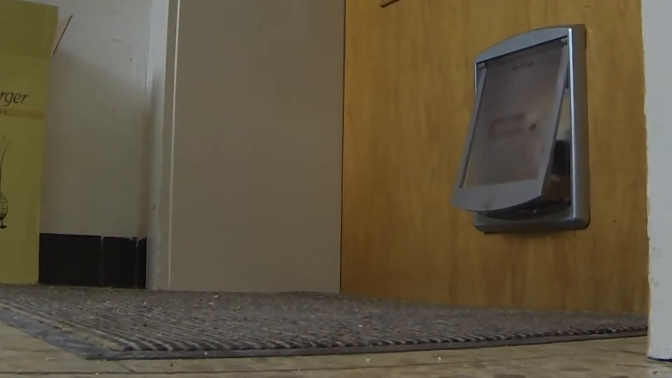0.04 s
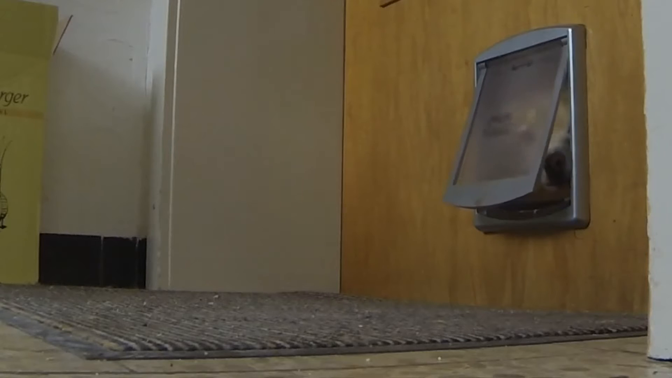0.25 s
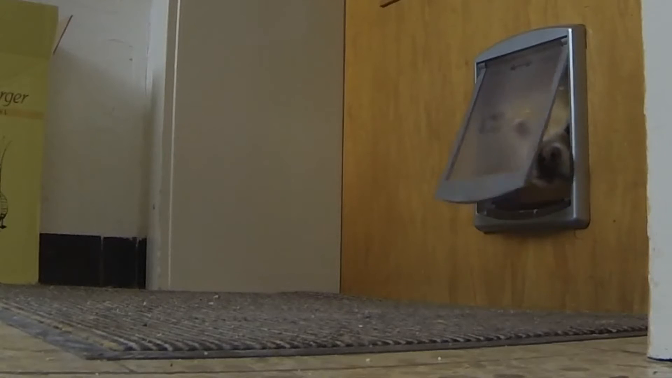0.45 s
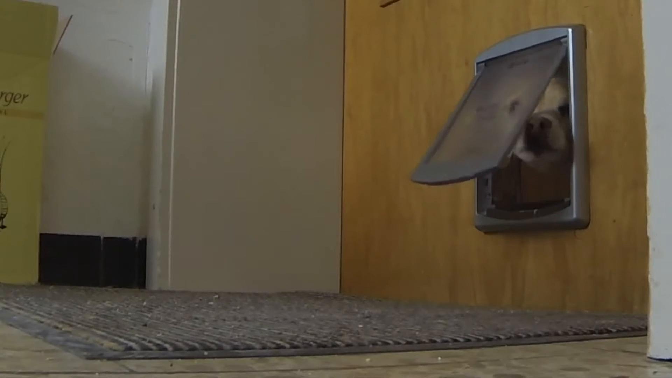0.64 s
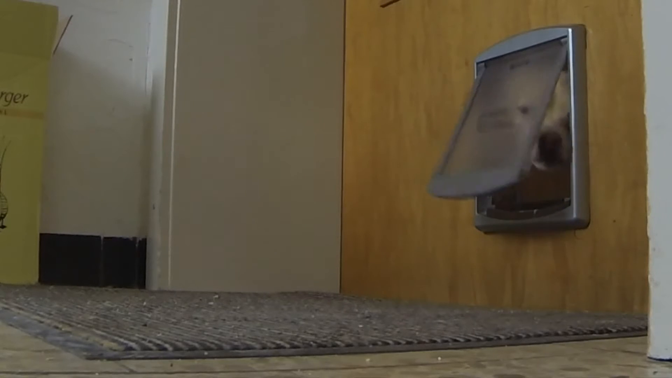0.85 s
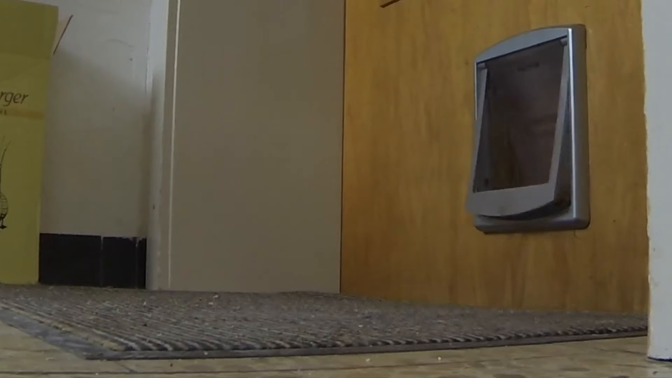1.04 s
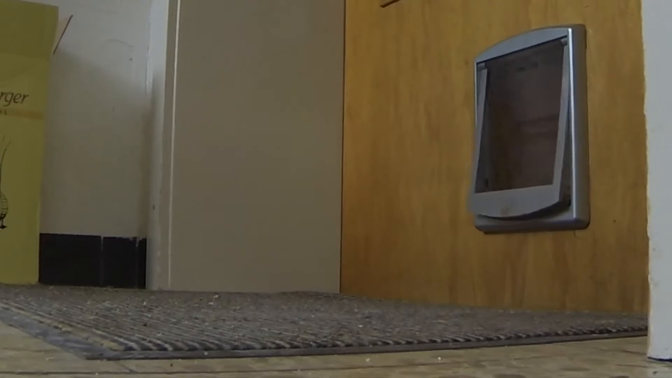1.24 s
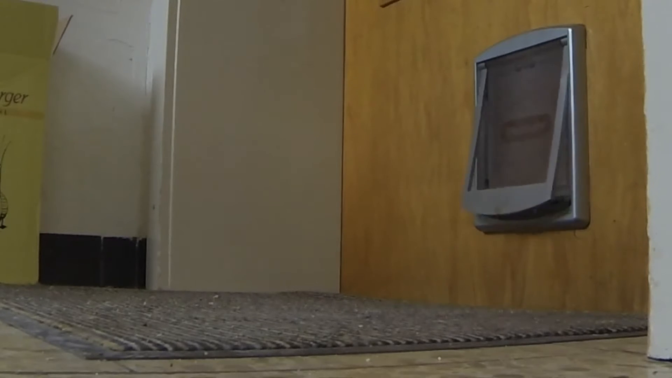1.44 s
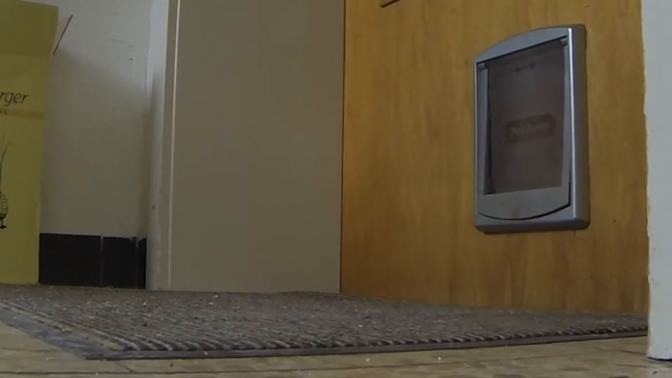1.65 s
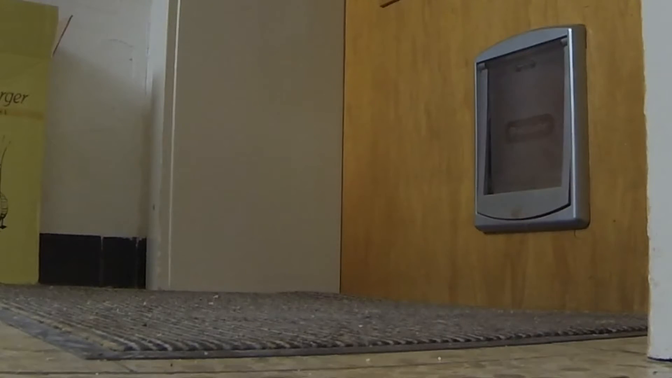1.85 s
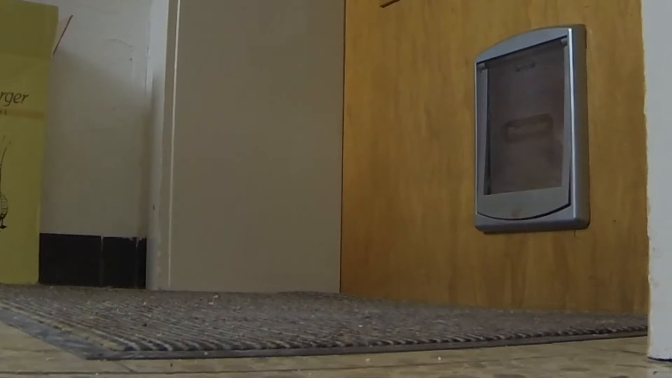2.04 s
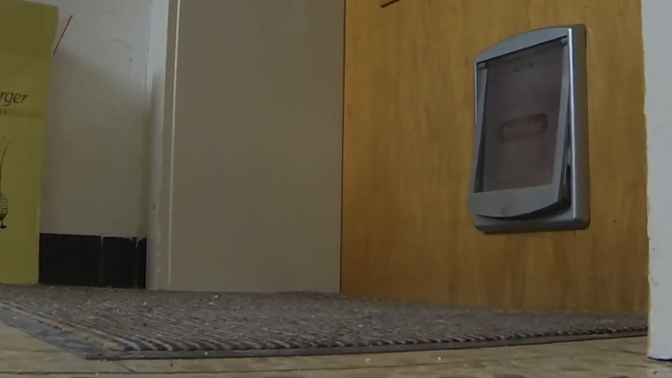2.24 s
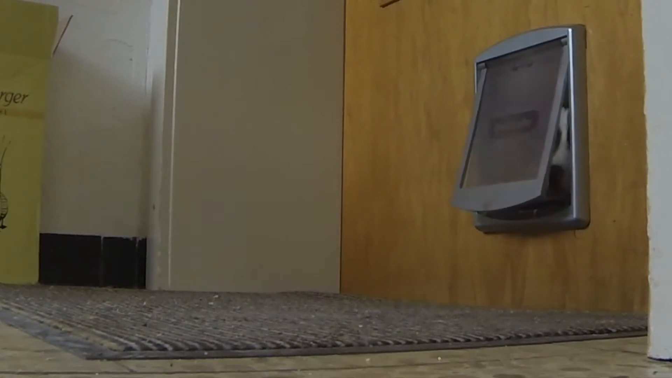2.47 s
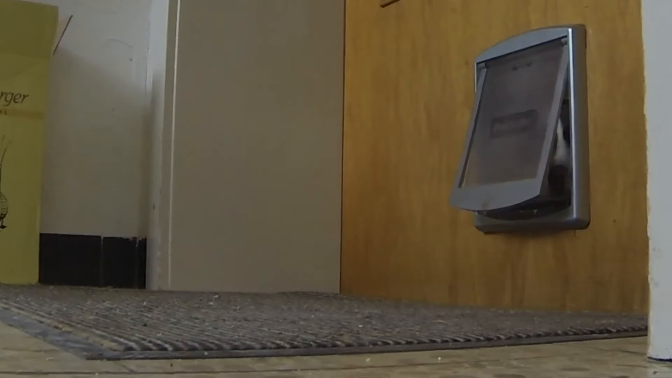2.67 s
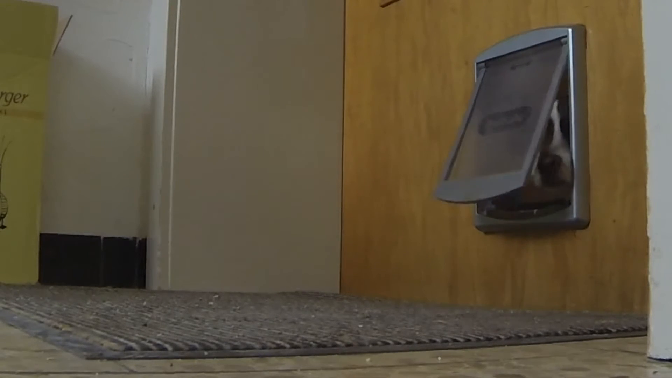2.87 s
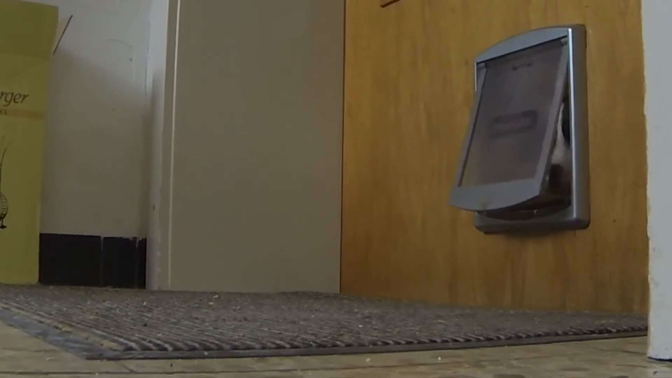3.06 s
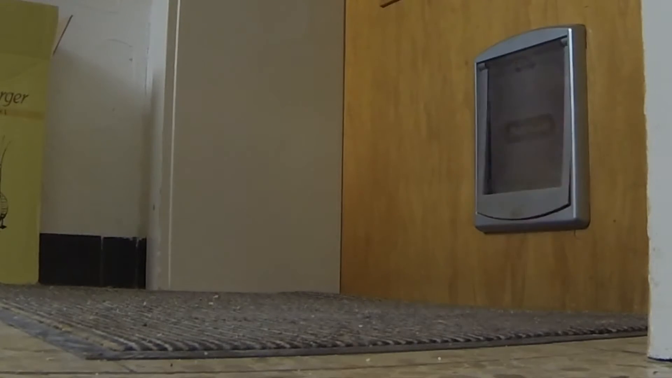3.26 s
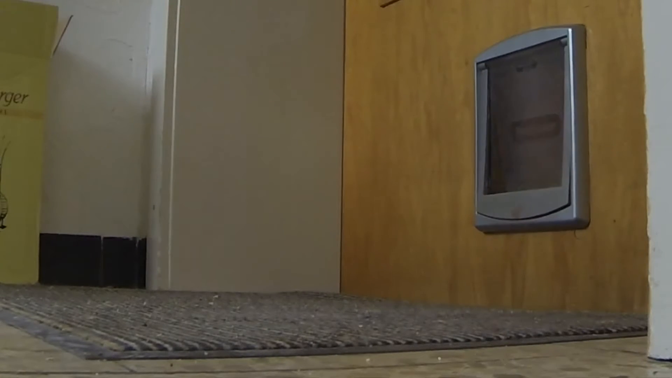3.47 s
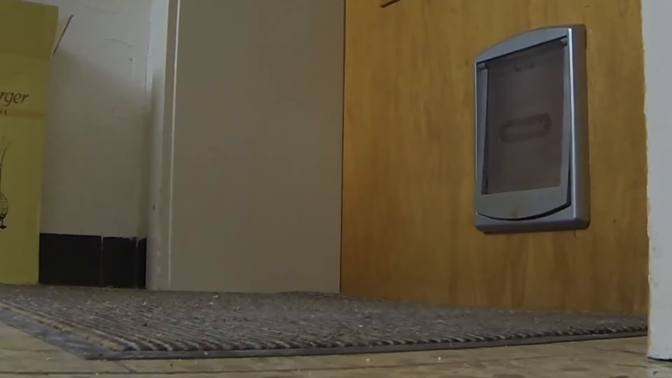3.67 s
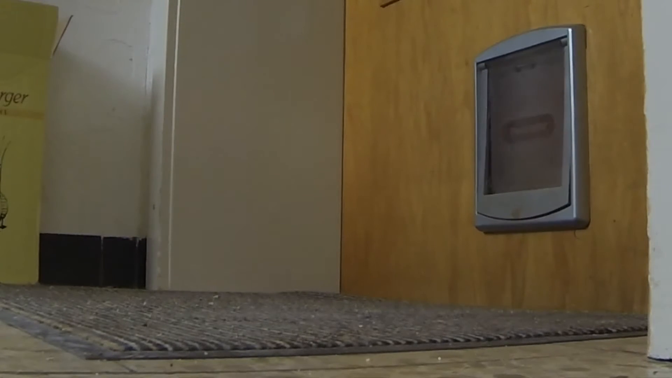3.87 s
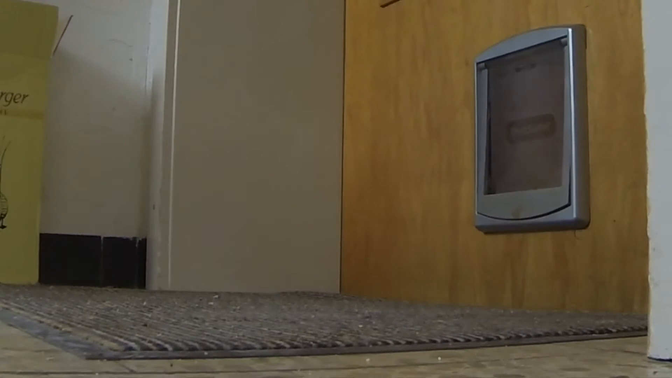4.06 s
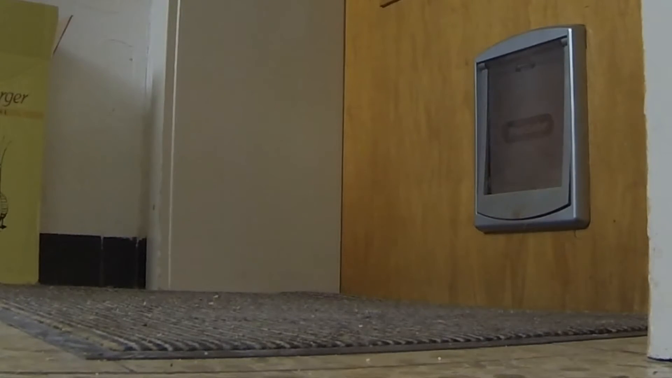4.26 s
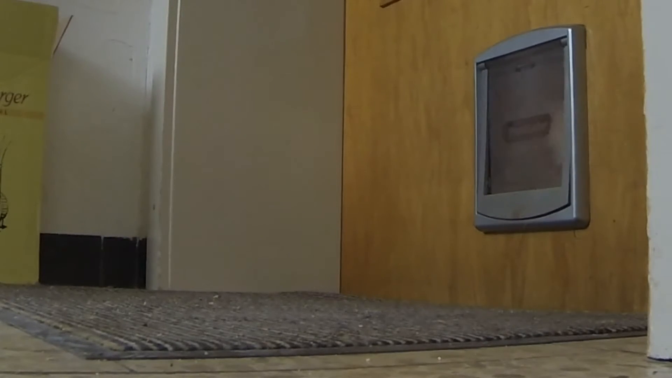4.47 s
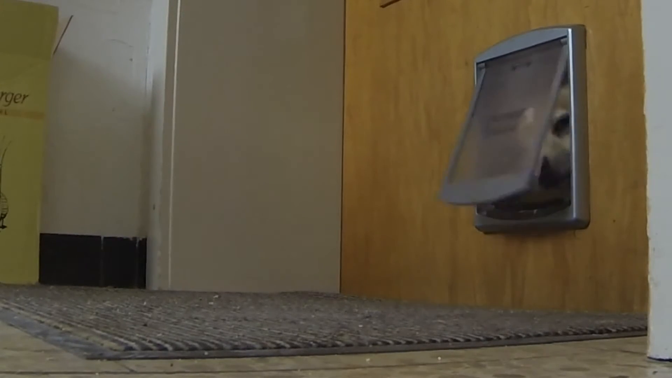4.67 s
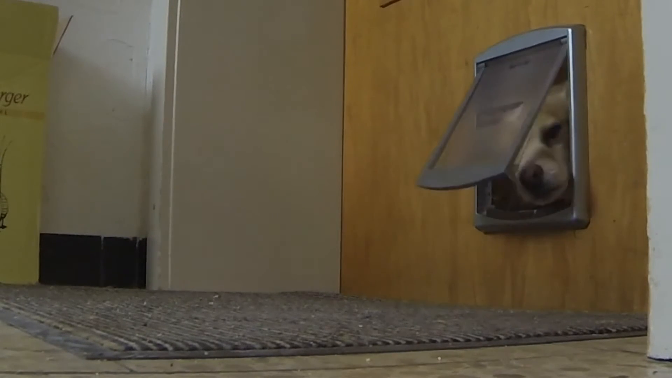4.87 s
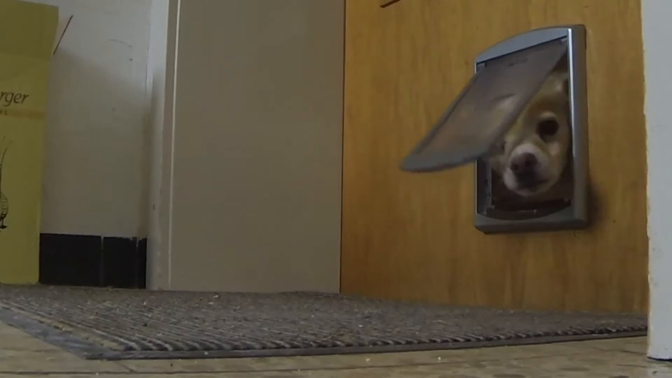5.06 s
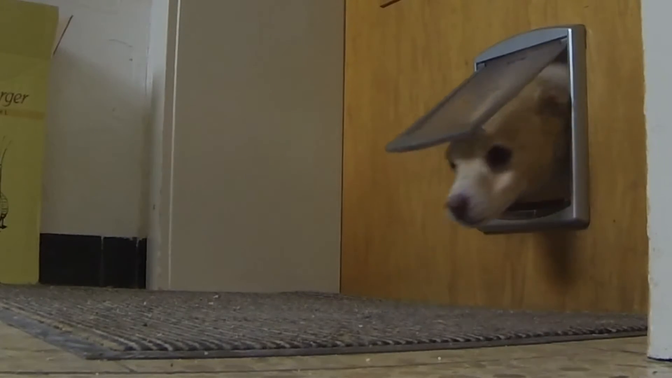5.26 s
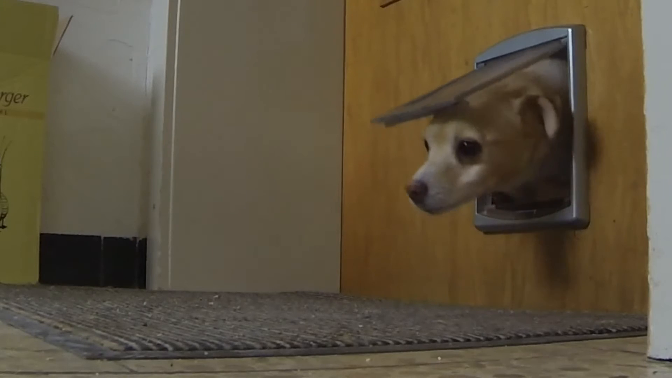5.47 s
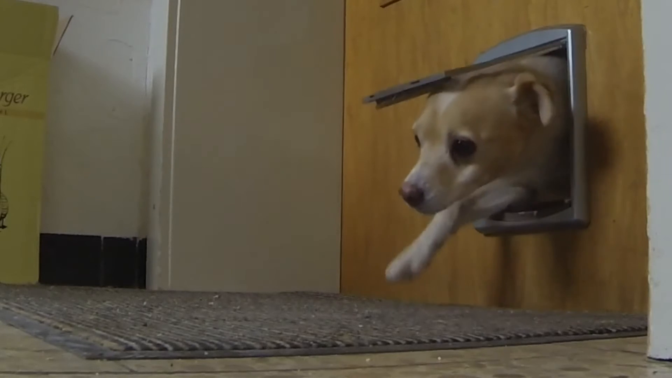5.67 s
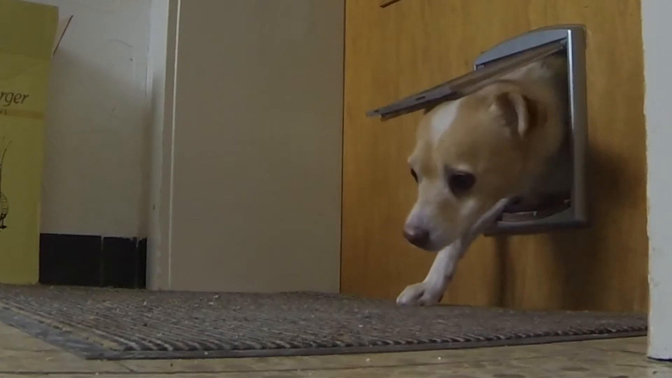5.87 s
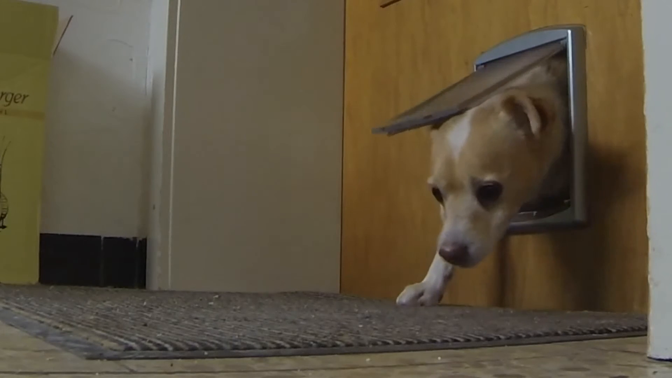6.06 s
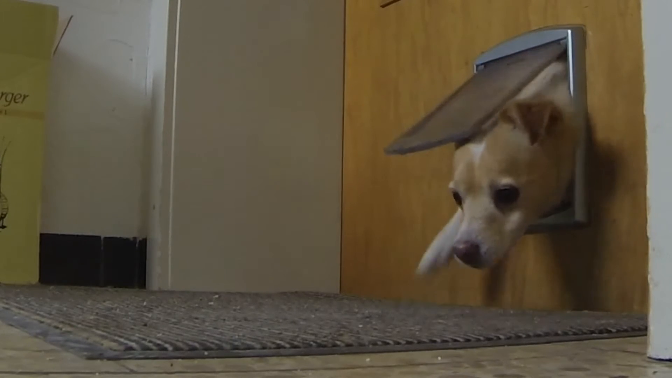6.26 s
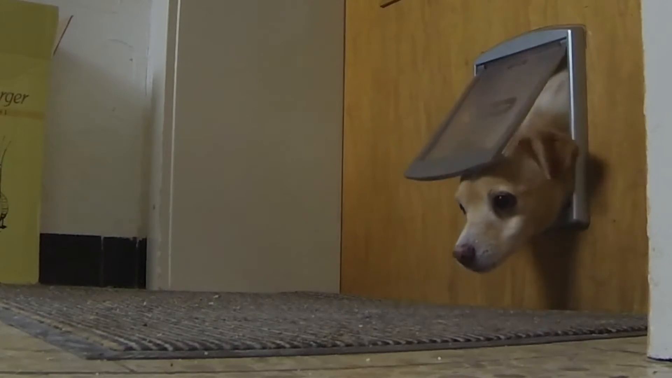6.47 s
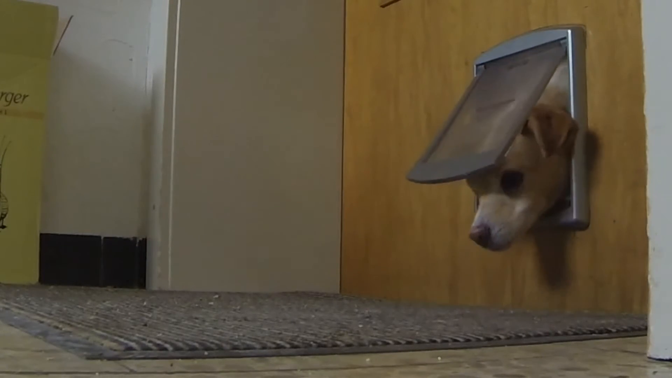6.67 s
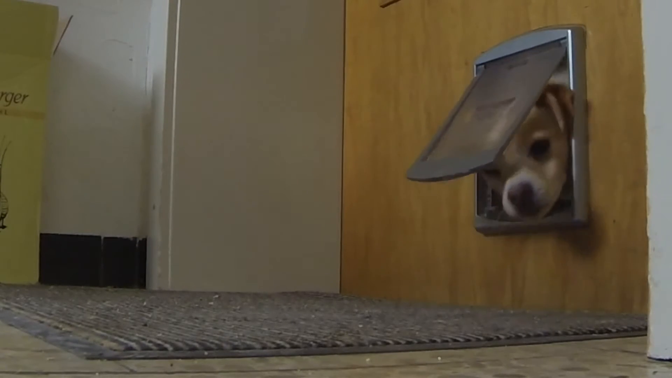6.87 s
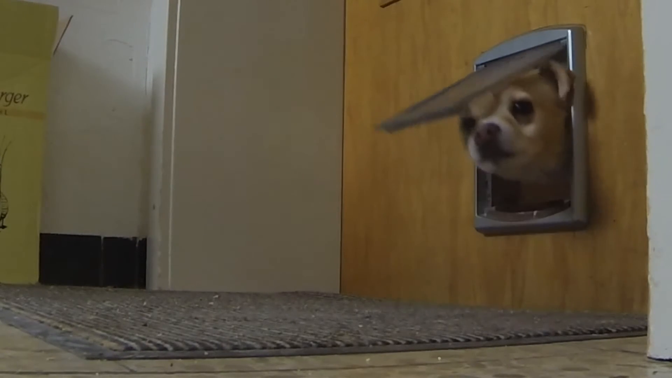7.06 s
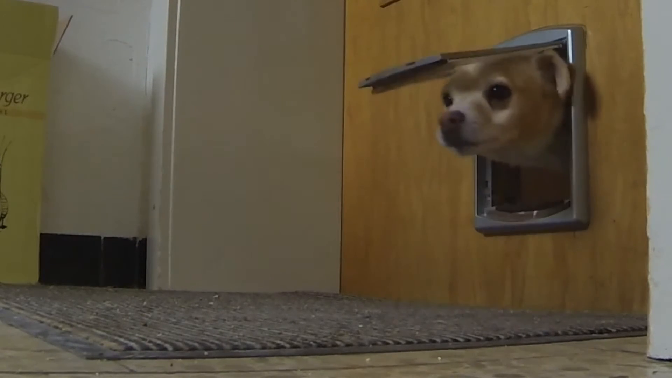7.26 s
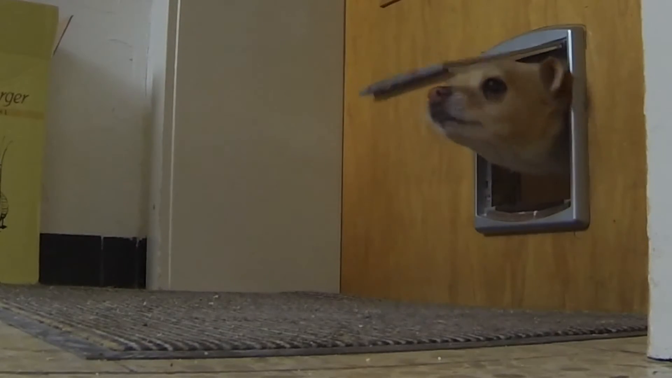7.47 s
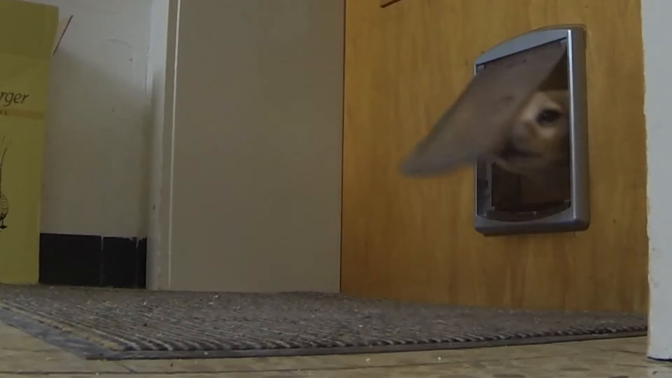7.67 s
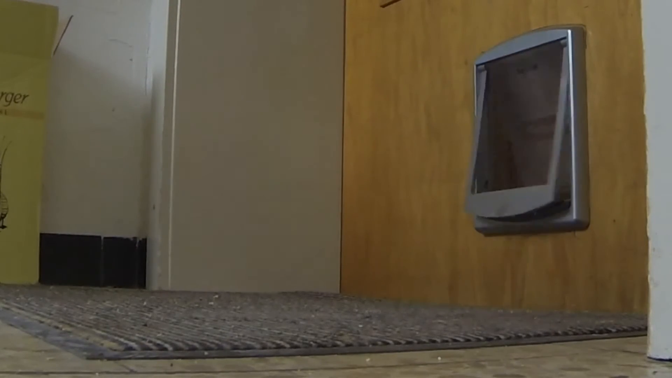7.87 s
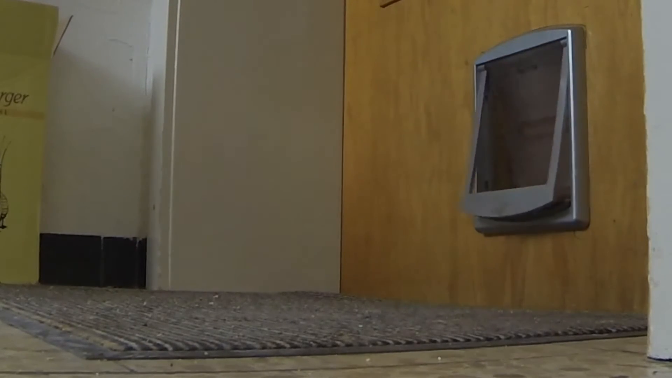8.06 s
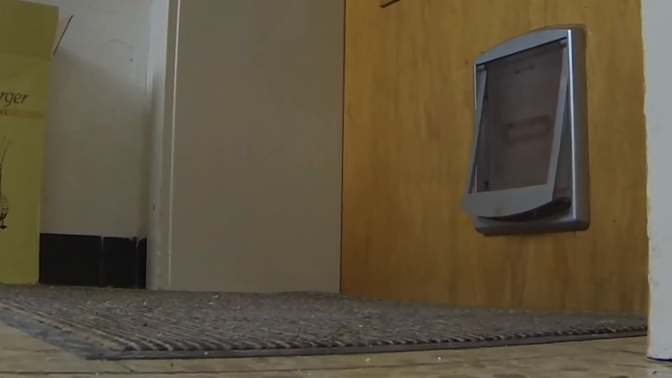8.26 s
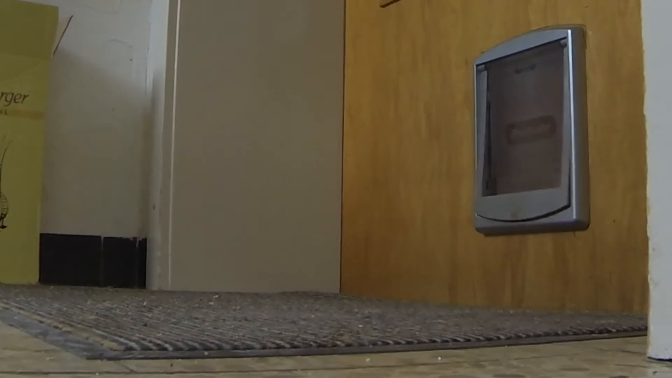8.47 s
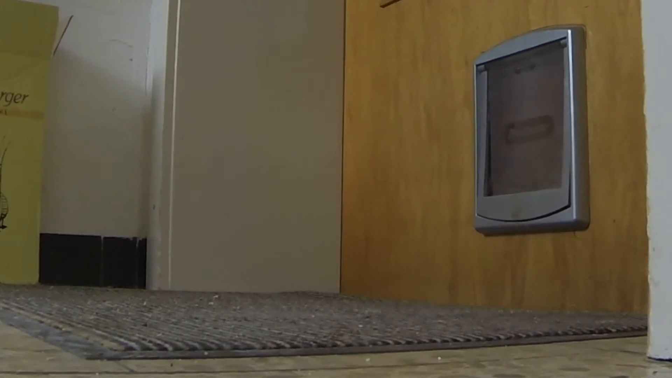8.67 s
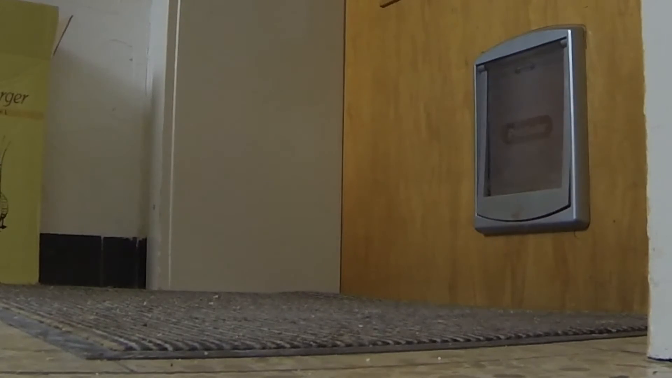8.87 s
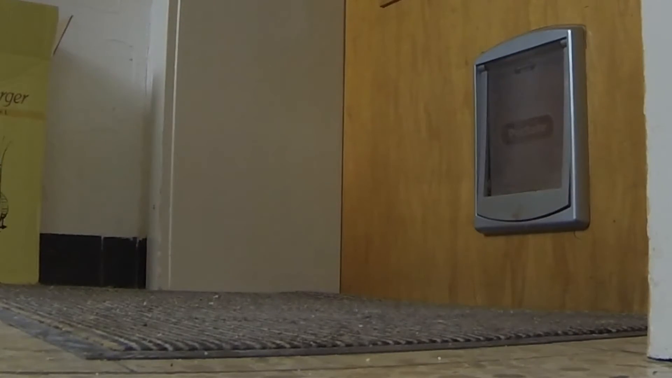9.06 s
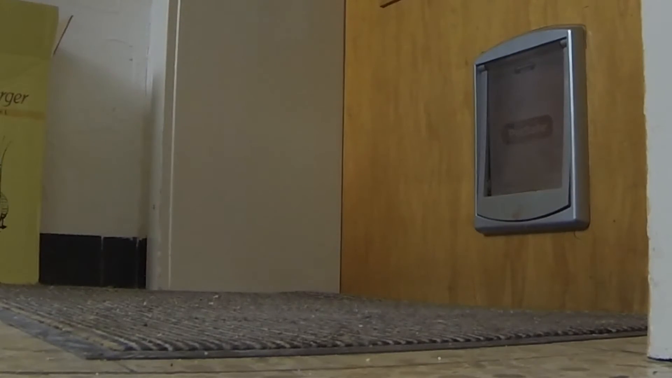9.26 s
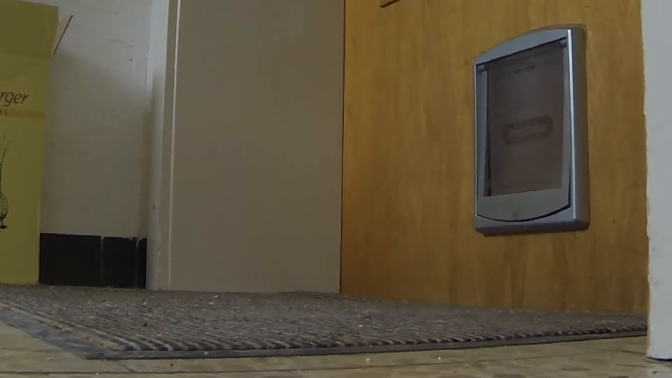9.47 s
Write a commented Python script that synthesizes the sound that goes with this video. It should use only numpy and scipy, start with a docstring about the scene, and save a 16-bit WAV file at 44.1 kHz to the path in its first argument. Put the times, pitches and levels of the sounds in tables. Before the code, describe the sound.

Irregular hard plastic clacks and wooden thuds from a swinging dog flap in a bare, echoing hallway, with soft bumps, fur rubs and faint machine drone.

```python
"""A plastic pet flap in a wooden door ticks on its frame, swings back and slams on its catch: damped modes and noise bursts.
A small dog noses the flap, leans through and withdraws: padded bumps, and fur rubbing the frame as grainy noise.
The place is a bare hallway, heard as an echo off the facing wall and a diffuse tail whose treble dies first.
A machine somewhere in the house hums low and throbs: a narrow noise band, with thin tones and still air around it."""
import sys
import numpy as np
from scipy import signal
from scipy.fft import rfft, irfft, next_fast_len
from scipy.io import wavfile
from scipy.ndimage import map_coordinates

SR = 44100
rng = np.random.default_rng(int(sys.argv[2]) if len(sys.argv) > 2 else 0)


def wav_out(sig):
    """Save sig, one row per channel (or a flat mono array), as 16-bit PCM at SR to the path in sys.argv[1]."""
    wavfile.write(sys.argv[1], SR, np.round(np.clip(np.atleast_2d(sig).T, -1, 1) * 32767).astype(np.int16))


N = 419829  # samples in the scene
T = np.arange(int(.8 * SR)) / SR  # time axis of one blow, s
HZ = np.fft.rfftfreq(len(T), 1 / SR)
HEAD = int(.06 * SR)  # samples in the loud first part of a blow


def amp(db):
    """Decibels to gain."""
    return 10 ** (np.asarray(db) / 20)


def unit(x):
    """Scale to rms 1."""
    return x / np.sqrt(np.mean(x ** 2) + 1e-20)


def unit_head(x):
    """Scale a blow so that its loud first part has rms 1."""
    return x / np.sqrt(np.mean(x[:HEAD] ** 2) + 1e-20)


def along(points, hz):
    """Read a curve of (pitch_hz, value) points on a log pitch axis."""
    point_hz, value = np.transpose(points)
    return np.interp(np.log(hz + 1), np.log(point_hz + 1), value)


def wobble(rate):
    """A smooth random curve with the given number of knots a second."""
    knots = rng.standard_normal(int(N * rate / SR) + 4)
    return map_coordinates(knots, [np.arange(N) * rate / SR])


def noise(spectrum):
    """Noise of rms 1, coloured by a spectrum."""
    m = next_fast_len(N + 8192)
    white = rfft(rng.standard_normal(m))
    gain = amp(along(spectrum, np.fft.rfftfreq(m, 1 / SR)))
    return unit(irfft(white * gain, m)[:N])


def colour(x, points):
    """Causal filter for one blow, with the gain of (pitch_hz, gain_db) points."""
    # folding the cepstrum gives minimum phase, so nothing sounds before the blow
    cepstrum = irfft(np.log(np.maximum(amp(along(points, HZ)), 1e-4)))
    cepstrum[1:len(T) // 2] *= 2
    cepstrum[len(T) // 2:] = 0
    return irfft(rfft(x) * np.exp(rfft(cepstrum)))


def add(track, s, sound):
    """Mix a sound into the track at a time in seconds."""
    start = max(0, round(s * SR))
    track[start:start + len(sound)] += sound[:max(0, N - start)]


def delayed(x, seconds):
    """One blow, later by the given time."""
    return np.interp(T - seconds, T, x, left=0)


# decay of the bare hallway: pitch_hz [Hz], t60_s [s]
HALL_DECAY = [(150, 0.72), (700, 0.52), (1840, 0.49), (4850, 0.44), (12800, 0.32)]


def hall_tail():
    """Diffuse hallway echo of energy 1: noise that builds up, then dies, treble first."""
    hz, t, grid = signal.stft(rng.standard_normal(len(T)), SR, nperseg=256)
    decay = amp(-60 * t / along(HALL_DECAY, hz)[:, None])
    tail = signal.istft(grid * decay, SR, nperseg=256)[1][:len(T)]
    tail *= 1 - np.exp(-T / 0.005)
    return tail / np.linalg.norm(tail)


# rumble of the distant machine, a narrow band that beats with itself:
# pitch_hz [Hz], level_db [dB per Hz, relative]
HUM_BAND = [(55, -57), (67, -26.5), (72, -6), (75, -4.5), (77.5, -4), (81, -5.5), (84, -15.5), (95, -50),
            (200, -120)]
# uneven level of the hum, with random wavering and quick dips, before its depth is scaled:
# start_s [s], level_db [dB]
HUM_WAVERING = [(0.0, -40), (0.79, -40.5), (1.01, -56), (1.03, -38.5), (2.41, -37.5), (2.46, -48.5),
                (3.37, -31), (3.42, -45), (5.12, -38), (5.41, -58), (5.62, -30.5), (5.86, -39.5),
                (6.79, -38.5), (7.77, -46), (8.38, -25.5), (8.48, -39.5), (9.44, -37.5), (9.52, -44)]


def hum(level_db=0.23, throb=0.88, depth=.7):
    """A machine's low drone: neighbouring pitches in a narrow band beat, so it wavers and throbs."""
    drone = signal.hilbert(noise(HUM_BAND), next_fast_len(N))[:N]
    db = np.interp(np.arange(N) / SR, *np.transpose(HUM_WAVERING))
    uneven_db = db.mean() + depth * (db - db.mean())
    # a throb under 1 evens out the beats
    throbbing = np.abs(drone) ** throb * np.cos(np.angle(drone))
    return amp(level_db + uneven_db) * unit(throbbing)


def tone(hz, drift_hz, rate):
    """A sine of rms 1 whose pitch wanders."""
    return np.sqrt(2) * np.sin(2 * np.pi * np.cumsum(hz + drift_hz * wobble(rate)) / SR)


# faint tones in the house, around which pitch and level wander: pitch_hz [Hz], level_db [dB]
THIN_TONES = [(101.5, -54), (124, -60.5), (240, -69.5), (301.5, -76.5), (2998, -77.5), (7903, -85.5),
              (7951, -79.5)]
# still air of the hallway: pitch_hz [Hz], level_db [dB per Hz, relative]
STILL_AIR = [(20, -3.5), (34, -9), (48, -8), (62, -19), (90, -10.5), (103, 1.5), (128, 1), (155, -14),
             (330, -19.5), (500, -26.5), (800, -28.5), (1300, -33), (3000, -31.5), (5500, -46),
             (8000, -48.5), (11000, -46.5), (13500, -61.5), (15000, -50)]


def house(lines_db=0, air_db=-48.5):
    """The low hum, a few thin wandering tones and the still air of the hallway as steady noise."""
    lines = sum(amp(db + wobble(4.3)) * tone(hz, drift_hz=1.45, rate=8) for hz, db in THIN_TONES)
    return hum() + amp(lines_db) * lines + amp(air_db) * noise(STILL_AIR)


def burst(seconds):
    """A rough contact of energy 1: noise that builds and dies on the given time scale."""
    u = T / max(seconds, 1e-4)
    push = rng.standard_normal(len(T)) * np.sqrt(u) * np.exp(-u)
    return push / np.linalg.norm(push)


def ring(modes, scatter_db, attack, detune=0.00092):
    """Damped modes, struck at new strengths each time; the load on the part shifts them slightly."""
    hz, db, t60 = np.transpose(modes)[:, :, None]
    hz = hz * (1 + detune * rng.standard_normal(hz.shape))
    level = db + scatter_db * rng.standard_normal(hz.shape)
    phase = 2 * np.pi * rng.random(hz.shape)
    partials = amp(level - 60 * T / t60) * np.sin(2 * np.pi * hz * T + phase)
    return unit_head(np.sum(partials, axis=0) * (1 - np.exp(-T / attack)))


def body(tilt, resonances, scatter_db):
    """(pitch_hz, gain_db) points of a plastic part: a smooth slope with humps that vary with where it is struck."""
    humps = sum((db + scatter_db * rng.standard_normal()) * np.exp(-((HZ - hz) / width) ** 2 / 2)
                for hz, width, db in resonances)
    return np.column_stack([HZ, along(tilt, HZ) + humps])


# edges between the ranges of door wood, frame, flap ring and edge tick: pitch_hz [Hz]
PART_RANGES = [400, 1400, 2800, 4300, 15000]


def balance(blow, part_db):
    """Where the flap lands decides how strongly wood, frame, flap and edge sound."""
    power = 2 * np.abs(rfft(blow[:HEAD], len(T))) ** 2 / (HEAD * len(T))
    points = []
    for lo, hi, db in zip(PART_RANGES, PART_RANGES[1:], part_db):
        gain = db - 10 * np.log10(power[(HZ >= lo) & (HZ < hi)].sum())
        points += [(lo * 1.1, gain), (hi / 1.1, gain)]  # gaps let the gain glide between parts
    return colour(blow, points)


# flap and frame modes: pitch_hz [Hz], level_db [dB, relative], t60_s [s]
PLASTIC_MODES = [(648, -9, 0.57), (787, -18, 0.46), (812, -6, 0.49), (891, -9.5, 0.572), (1113, -16, 0.81),
                 (2331, -18, 0.35), (2450, -22, 0.58), (3090, -4.5, .38), (2995, 8, 0.085), (3117, 1, 0.39),
                 (3140, -8, 0.27), (3290, -5, .32), (3550, -14, 0.47), (3800, -2, 0.16), (3870, 0, .18),
                 (3900, -6, 0.36), (5130, -11.5, 0.085)]


def blows(rows, parts, tilt, resonances, direct_db, wall_db, ring_db,
          wall_s=.015, fresh_db=-5, dull_db=-4, lead_db=-16, damping_db=0.47):
    """Each contact cracks, returns from the facing wall, fills the hall and rings the plastic."""
    track, hall = np.zeros(N), hall_tail()
    share_db, per_brightness, per_softness = np.transpose(parts)
    for s, contact_ms, level_db, bright_db in rows:
        contact = max(contact_ms, 1.3) / 1000  # s
        crack = burst(contact)
        # the flap stays in one place, so much of the echo is the same each time
        echo = (hall + amp(fresh_db) * hall_tail()) * (1 - np.exp(-T / contact))
        # the path by way of the wall is about 5 m longer than the direct one
        wall = amp(wall_db) * delayed(burst(2.0 * contact), wall_s)
        # walls and mat soak up the treble, so the direct crack is the brightest part
        echo = colour(echo + wall, [(4000, 0.0049), (10000, dull_db)])
        shape = body(tilt, resonances, scatter_db=2)
        clack = unit_head(colour(amp(direct_db) * crack + echo, shape))
        # a slow, padded contact rings the plastic less
        ringing = ring(PLASTIC_MODES, scatter_db=0.5, attack=contact + 0.0018)
        ringing = amp(ring_db - damping_db * contact_ms) * ringing
        # a bright blow favours the flap over the wood; a slow one loses its edge tick
        part_db = level_db + share_db + per_brightness * bright_db + per_softness * np.log10(contact_ms)
        blow = balance(clack + ringing, part_db)
        add(track, s, blow)
        # a weak, fading copy of the blow leads it by the contact time and softens the onset
        add(track, s - contact, amp(lead_db) * blow * np.exp(-T / 0.014))
    return track


# the flap striking its frame: start_s [s], contact_ms [ms], level_db [dB before part shares and trim],
# bright_db [dB, flap ring over door wood]
FLAP_KNOCKS = [(.004, 4.2, -56, 6.5), (.127, 1.9, -49, -5), (.251, 1, -48, 0), (.375, 1.4, -45, -3),
               (.449, 1.5, -49, 2), (.874, 5.6, -58.5, 1), (1.012, 6.5, -31, 0), (1.04, 3, -35.5, 3.5),
               (1.365, 2.05, -28.5, 9), (1.699, 5.3, -46, 6), (1.721, 6.5, -45.5, 4.5), (2.131, 2, -43, 9),
               (2.355, 2.1, -48, 4), (2.504, 0.63, -47, 7), (2.945, 4.4, -56, -10), (2.962, 1.4, -45, -0.5),
               (3.099, 4.2, -58.5, 0), (3.17, 2.1, -41, -1), (3.295, 7.6, -44.5, 6), (3.318, 5.5, -45, 2.5),
               (3.674, 2.8, -50.5, 8.5), (3.86, 6.2, -64, 1), (4.435, 0.97, -45.5, 8.5),
               (4.522, 5.6, -48, -10.5), (4.533, 1.5, -38, 14.5), (4.642, 1.9, -35, 0),
               (4.841, 2.5, -45, 1), (4.853, 1.4, -39.5, 1), (4.966, 2.7, -46.5, -6), (4.985, 1, -33, 3.5),
               (7.569, 8.5, -45.5, -14), (7.589, 7, -41.5, -6), (7.638, 2.3, -40, -0.5),
               (7.655, 3, -34.5, 3.5), (7.68, 2.8, -40.5, 2), (7.847, 6.9, -27.5, -2),
               (7.861, 3.2, -38.5, 7), (7.9, 1.9, -45.5, 0), (8.204, 1.2, -28.5, 7.5),
               (8.533, 4.4, -45.5, 2.5), (8.556, 6.2, -48, 6.5), (8.893, 4, -68.5, -2)]
# how door wood, frame, flap ring and edge tick (one row each) share a knock:
# share_db [dB], per_brightness [dB per dB], per_softness [dB per tenfold contact time]
FLAP_SHARES = [(0, -.5, 0), (-0.96, 0, 2), (0.5, .5, -2), (-5.5, 0.03, -8.5)]
# smooth slope of the flap's sound: pitch_hz [Hz], level_db [dB per Hz, relative]
FLAP_SLOPE = [(60, -33), (195, -7.5), (250, -6.5), (420, -9), (700, -6.5), (1500, -9), (2300, -5.5),
              (2750, -8.5), (3400, -6), (4400, -15.5), (7000, -23), (11500, -28), (15500, -36.5)]
# broad resonances of the flap: pitch_hz [Hz], width_hz [Hz], lift_db [dB]
FLAP_HUMPS = [(865, 196, 5), (2450, 46, 3), (3107, 127, 9), (3653, 310, 9), (5220, 210, 4.5),
              (8830, 240, 7.5)]


def knocks(level_db=-.5):
    """The flap ticks and slams on its frame: sharp contacts with plenty of plastic ring."""
    track = blows(FLAP_KNOCKS, FLAP_SHARES, FLAP_SLOPE, FLAP_HUMPS, direct_db=-6, wall_db=-12.0, ring_db=-5.5)
    return amp(level_db) * track


# the dog bumping the open flap and frame: start_s [s], contact_ms [ms],
# level_db [dB before part shares], bright_db [dB, roughly flap ring over door wood]
DOG_BUMPS = [(.543, 1.9, -56, -14.5), (.786, 7.7, -61.5, -17.5), (2.588, 3.1, -53.5, -7.5),
             (2.699, 4.2, -56.5, -7.5), (3.993, 3.7, -67, -16), (4.059, 6, -64, -7),
             (5.308, 10, -56.5, -10.5), (5.484, 7.5, -53, -5.5), (5.525, 9.5, -53, -8),
             (5.546, 8.7, -49, -7.5), (5.672, 4.2, -32, -5), (5.921, 5, -56, -13), (6.239, 4.6, -62.5, -7),
             (6.275, 26, -56, -10.5), (6.374, 7.5, -59.5, -6.5), (6.505, 6, -49.5, 5),
             (6.574, 6.9, -46, -1), (6.592, 1.37, -39, 3), (6.946, 6.3, -57.5, -13), (7.37, 6.2, -62, -8.5)]
# how door wood, frame, flap ring and edge tick (one row each) share a bump:
# share_db [dB], per_brightness [dB per dB], per_softness [dB per tenfold contact time]
BUMP_SHARES = [(-1.26, -0.49, 0.5), (3, 0.16, -1), (-1.1, .5, 0), (-13.5, 0.35, -0.5)]
# smooth slope of the frame's sound: pitch_hz [Hz], level_db [dB per Hz, relative]
FRAME_SLOPE = [(60, -35), (200, -7), (420, -5.5), (700, -1), (1500, -6), (2500, -14.5), (3600, -17),
               (4600, -16), (7000, -24.5), (15500, -39)]
# broad resonances of the frame while the dog leans on it: pitch_hz [Hz], width_hz [Hz], lift_db [dB]
FRAME_HUMPS = [(574, 50, 2.5), (880, 167, 4.5), (1240, 95, 3), (2070, 270, 9.5), (3220, 370, 7),
               (5200, 300, 7)]


def bumps(level_db=0):
    """The dog's head and legs damp the flap and knock the frame, so the plastic hardly rings."""
    track = blows(DOG_BUMPS, BUMP_SHARES, FRAME_SLOPE, FRAME_HUMPS, direct_db=-2.5, wall_db=-12, ring_db=-28.0)
    return amp(level_db) * track


# strokes of fur and muzzle on flap and frame: start_s [s], length_s [s], level_db [dB before trim]
FUR_STROKES = [(0.952, 0.026, -47), (1.973, 0.18, -56), (5.467, 0.29, -55), (5.76, 0.21, -49.5),
               (5.974, 0.52, -55.5), (6.424, 0.27, -53), (7.32, 0.036, -56), (7.546, .05, -48)]
# rub of fur on plastic: pitch_hz [Hz], level_db [dB per Hz, relative]
FUR_RUB = [(120, -39), (200, -14), (242, -1), (430, -7), (999, -4), (1290, -13.5), (2010, -13.5),
           (2560, -19.5), (9000, -41.5), (11700, -69), (19800, -120)]
STROKE_ATTACK_S, STROKE_RELEASE_DB_PER_S = 0.018, 133


def rubbing(level_db=-2.0, catch_db=5, hall_db=2):
    """Fur catches and slips in fine grains, blurred by the hall; each stroke swells, holds and fades."""
    t = np.arange(N) / SR
    pressure = np.zeros(N)
    for s, length, db in FUR_STROKES:
        swell = np.clip((t - s) / STROKE_ATTACK_S, 0, 1)
        fade_db = STROKE_RELEASE_DB_PER_S * np.maximum(t - s - length, 0)
        pressure += swell * amp(db - fade_db)
    drag = unit(noise(FUR_RUB) * amp(catch_db * wobble(260)))
    echo = signal.fftconvolve(drag, hall_tail())[:N]
    return pressure * amp(level_db) * unit(drag + amp(hall_db) * echo)


# door panel modes: pitch_hz [Hz], level_db [dB, relative], t60_s [s]
DOOR_MODES = [(23, -31, .5), (36.4, -6, 1), (73, -11, 0.42), (109.4, -1, 1), (120.6, 6, 0.44),
              (159.4, 1.5, 0.74), (246.6, -1.5, 0.29), (285, -11, 0.266), (342.6, -6.5, .45)]
# hard blows that shake the door and snap the catch:
# start_s [s], thud_db [dB before trim], snap_db [dB before trim]
HARD_BLOWS = [(1.012, -33.5, -59), (1.367, -32, -36), (3.171, -69, -50), (4.534, -42.5, -42),
              (4.642, -49.5, -45), (4.855, -46, -42.5), (4.986, -38.5, -37.5), (5.673, -41, -43.5),
              (7.658, -50, -43), (7.85, -34.5, -64), (8.205, -31.5, -39)]


def thuds(level_db=-1):
    """Hard blows set the door panel booming in its low modes."""
    track = np.zeros(N)
    for s, thud_db, _ in HARD_BLOWS:
        add(track, s, amp(thud_db + level_db) * ring(DOOR_MODES, scatter_db=2.5, attack=0.0095))
    return track


SNAP_LAG_S = 0.0022  # the catch snaps this long after the blow


def snaps(echo_db=-5, level_db=-6):
    """The catch gives a short bright snap: a tiny noise burst and its hall echo, lifted in the treble."""
    bright = [(1500, -51), (5200, 15.0), (7000, -3), (9200, 9.0), (15000, -9)]  # Hz, dB
    track = np.zeros(N)
    for s, _, snap_db in HARD_BLOWS:
        snap = colour(burst(0.00066) + amp(echo_db) * hall_tail(), bright)
        add(track, s + SNAP_LAG_S, amp(snap_db + level_db) * unit_head(snap))
    return track


# contacts that leave one mode singing:
# start_s [s], pitch_hz [Hz, before slight detuning], level_db [dB before trim and flutter], t60_s [s]
SINGING_MODES = [(1.366, 3120, -24, .26), (1.367, 813, -36, 0.51), (1.714, 3112, -42, 0.33),
                 (2.133, 3135, -51, 0.36), (3.172, 2430, -46, .4), (3.311, 3100, -40.5, 0.23),
                 (4.06, 2170, -64, .39), (4.437, 3380, -42.5, .26), (4.987, 3050, -42, 0.46),
                 (5.527, 2080, -50.5, 0.35), (5.674, 2285, -38.5, 0.35), (6.594, 2115, -39.5, 0.44),
                 (7.372, 1873, -62, 0.27), (7.66, 2466, -37, 0.62), (8.206, 3115, -27, 0.35),
                 (8.212, 2446, -32, 0.31), (8.556, 2470, -52.5, 0.36)]


def singing(level_db=-2, flutter_db=6.0):
    """A freely swinging part rings on in one damped mode, and the tone flutters in level."""
    track = np.zeros(N)
    for s, hz, db, t60 in SINGING_MODES:
        add(track, s, amp(db + level_db) * ring([(hz, 0, t60)], scatter_db=0, attack=0.0013))
    return track * amp(flutter_db * wobble(70))


def scene(side_db=-81, spread_db=-35):
    """The sources reach both channels nearly alike; the channels differ only by a very faint, blurred copy of
    the flap's sounds and a faint noise."""
    flap = knocks() + bumps() + singing() + snaps() + thuds() + rubbing()
    mono = flap + house()
    diffuse = colour(hall_tail(), [(100, -20), (600, -9), (3000, -2.5), (9000, 7)])
    side = amp(spread_db) * signal.fftconvolve(flap, diffuse)[:N]
    side = side + amp(side_db) * noise([(30, 9), (1000, 4), (4000, -2.0), (15000, -22)])
    return np.array([mono + side, mono - side])


TOP_HZ = 15500


def record(dry):
    """The microphone side keeps nothing above its band limit."""
    m = next_fast_len(N + SR // 2)
    kept = np.fft.rfftfreq(m, 1 / SR) < TOP_HZ
    return irfft(rfft(dry, m) * kept, m)[:, :N]


dry = scene()
out = record(dry)
wav_out(out)
```